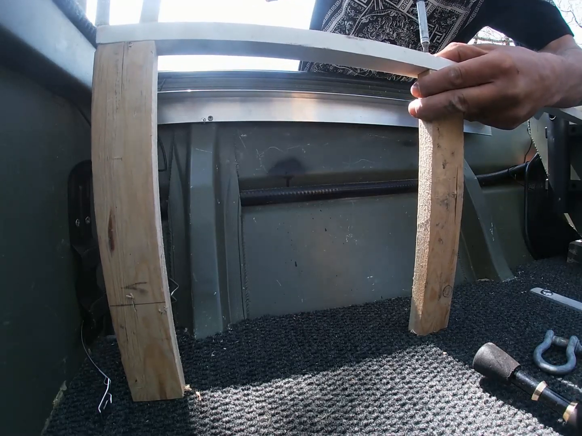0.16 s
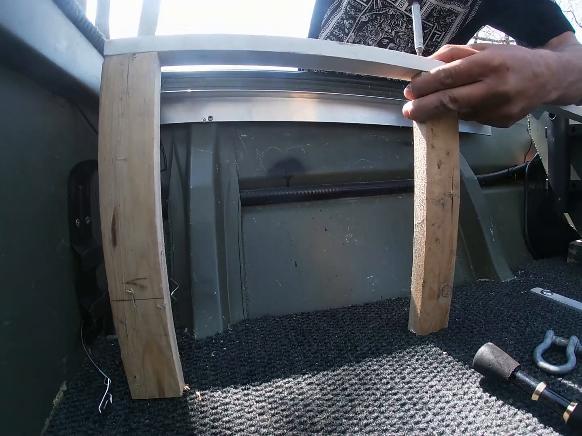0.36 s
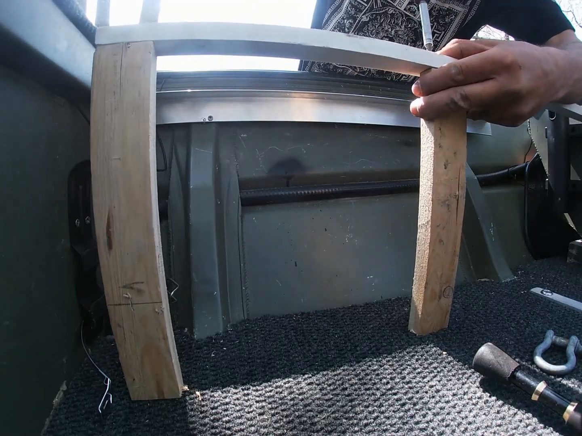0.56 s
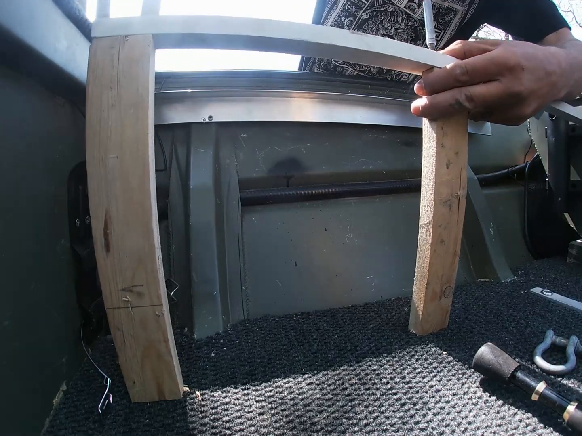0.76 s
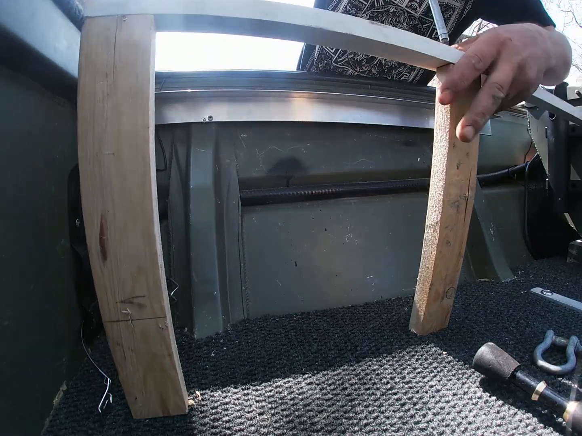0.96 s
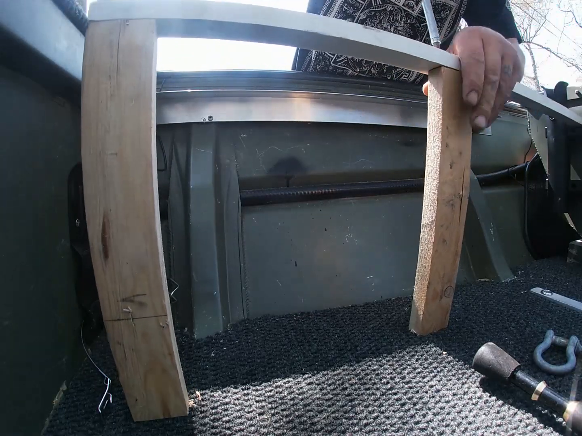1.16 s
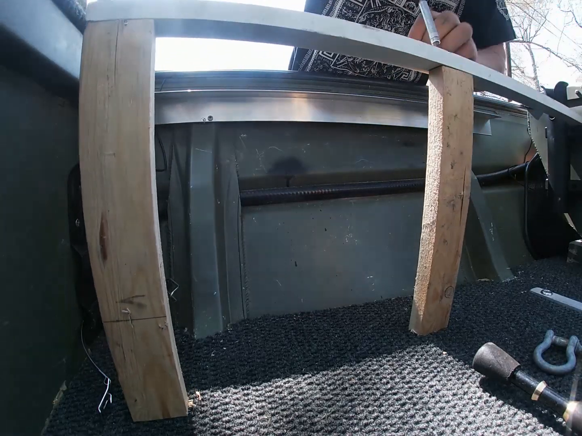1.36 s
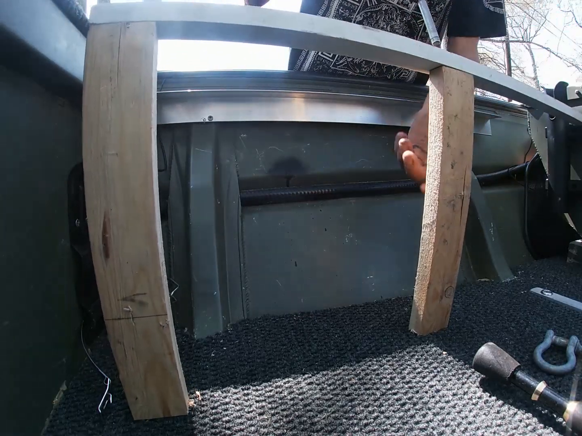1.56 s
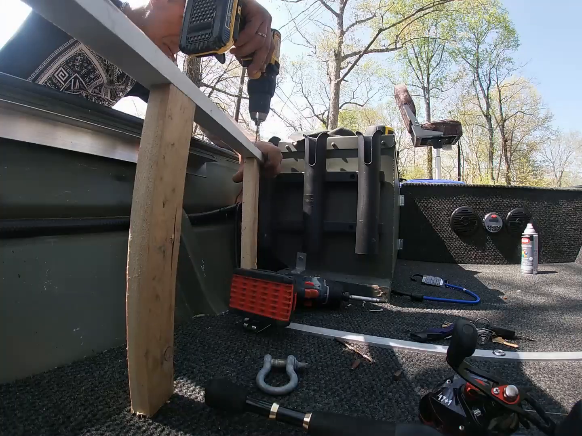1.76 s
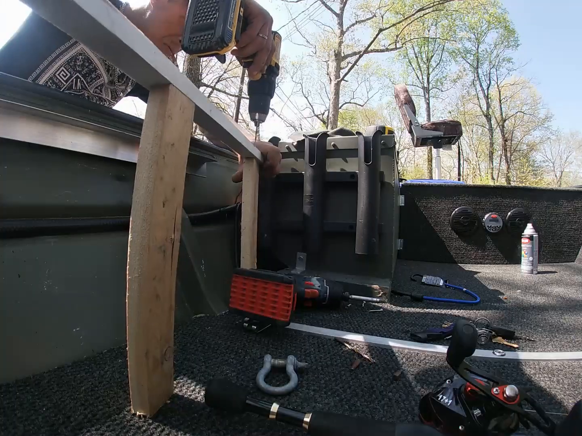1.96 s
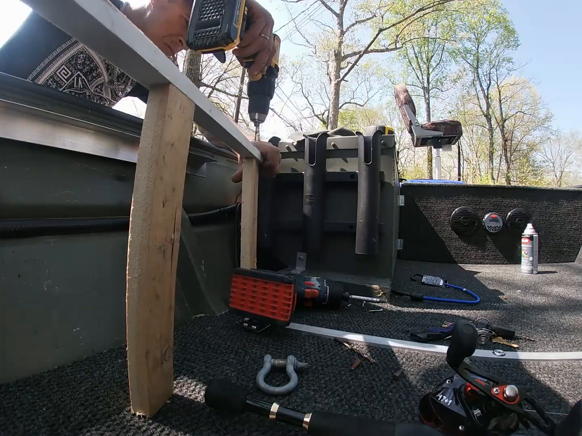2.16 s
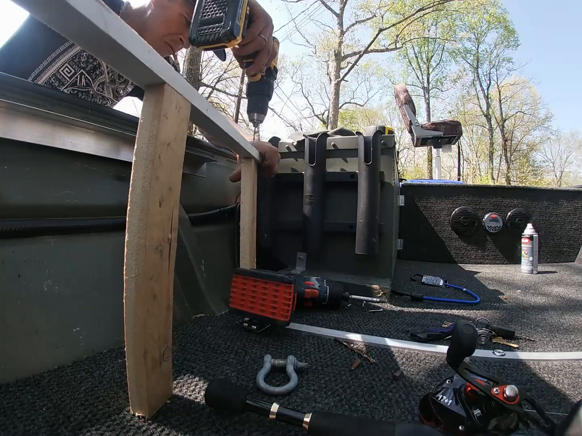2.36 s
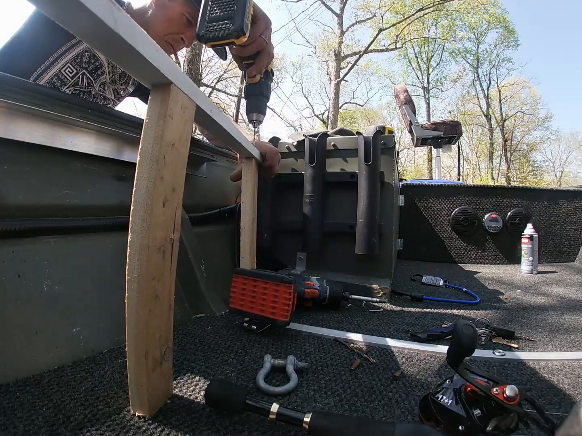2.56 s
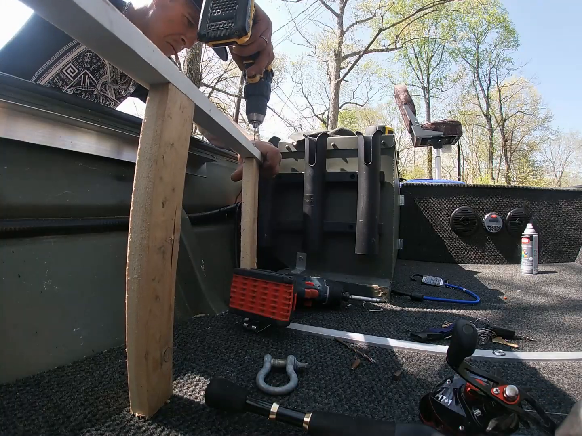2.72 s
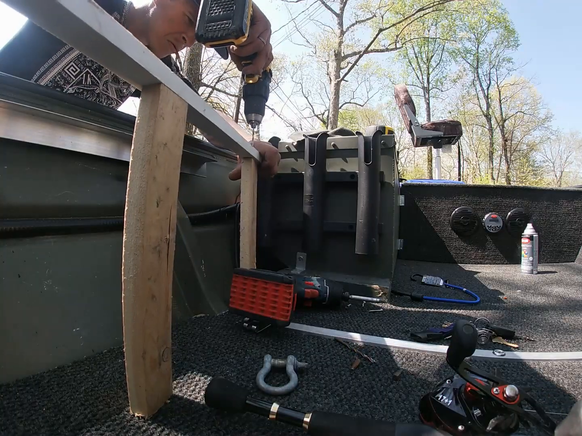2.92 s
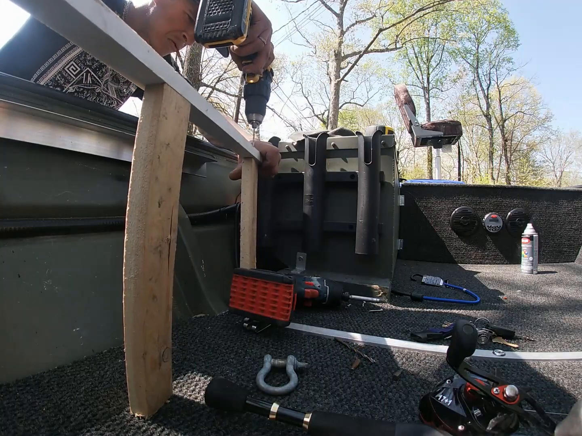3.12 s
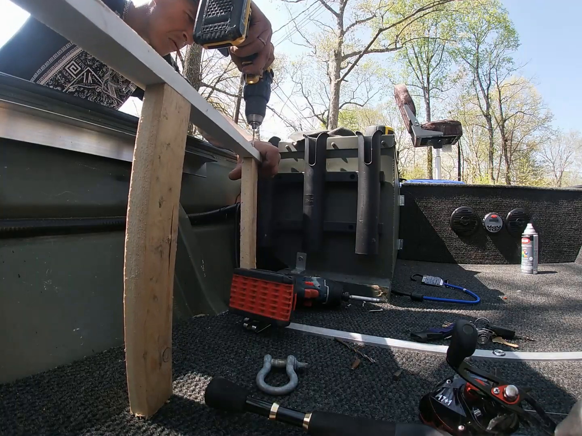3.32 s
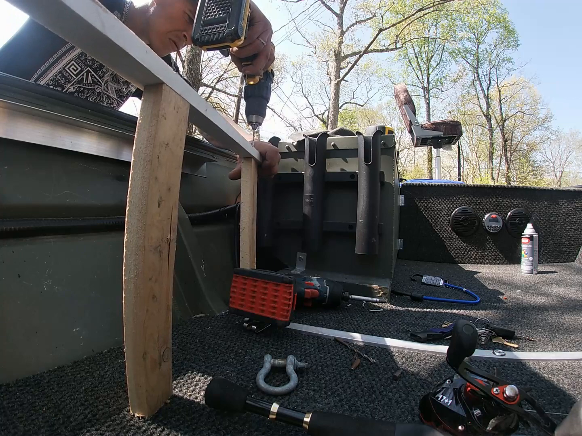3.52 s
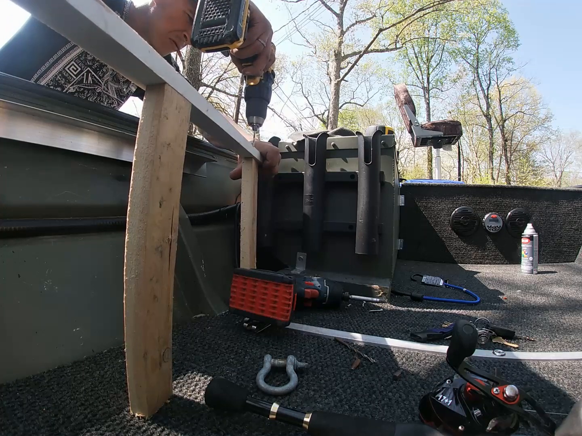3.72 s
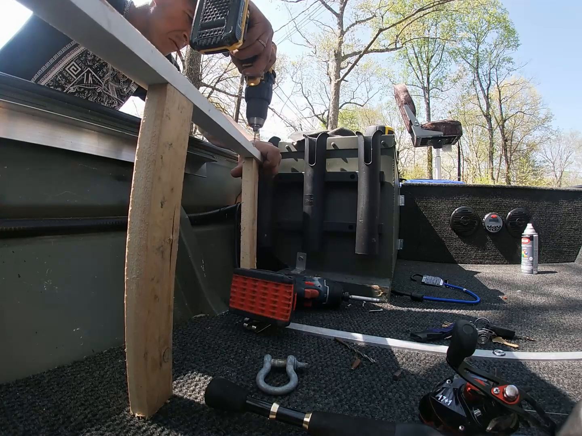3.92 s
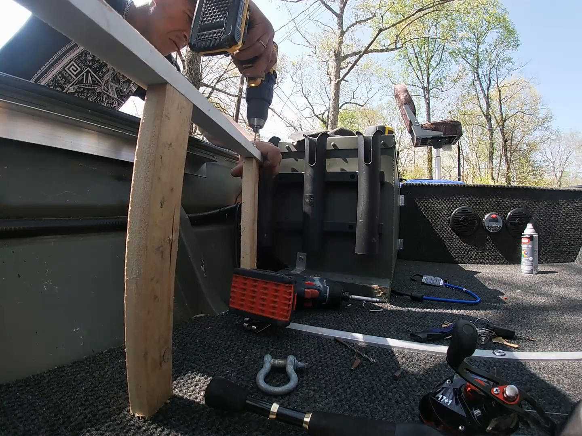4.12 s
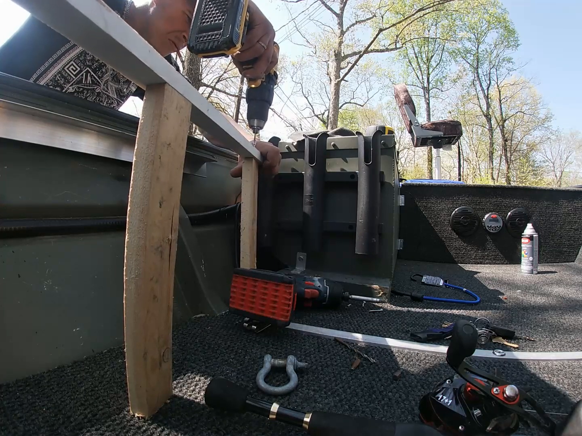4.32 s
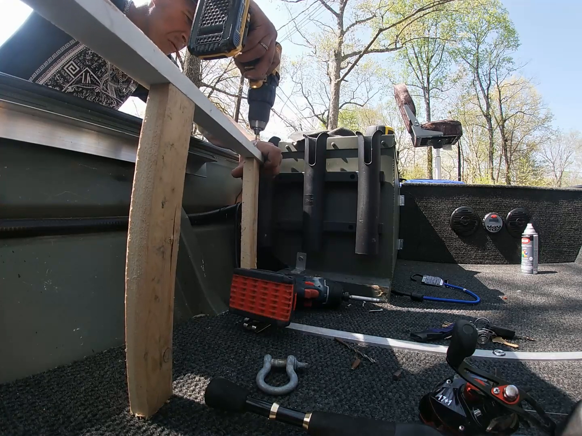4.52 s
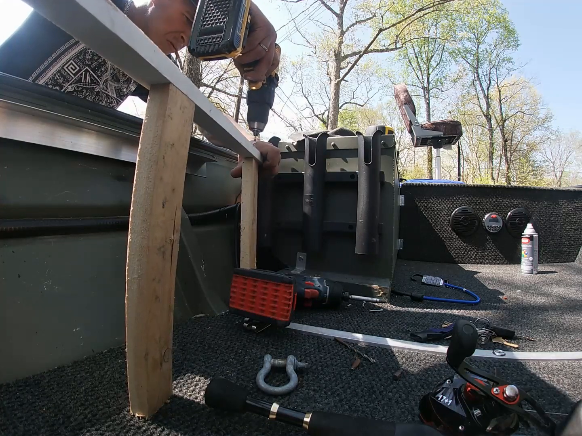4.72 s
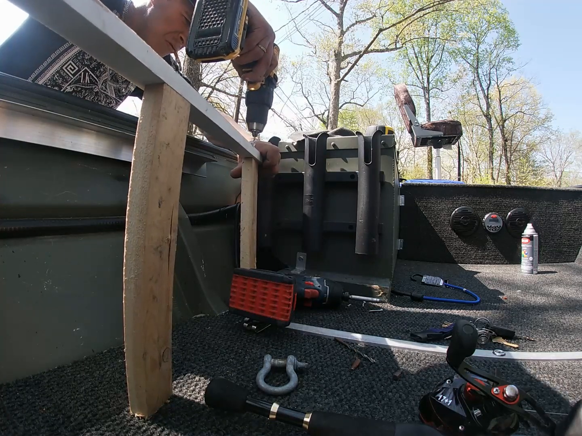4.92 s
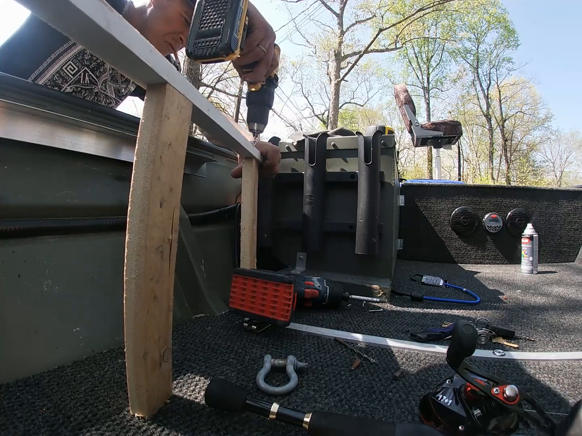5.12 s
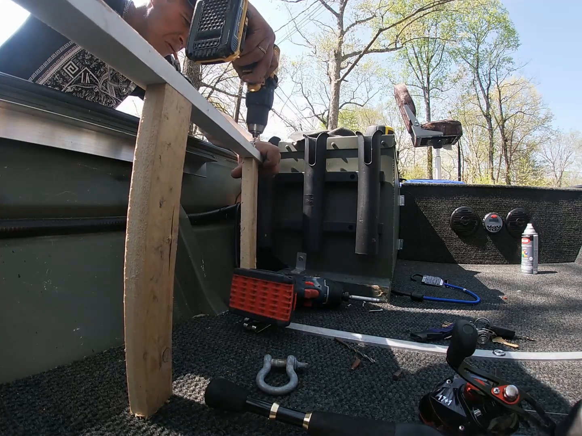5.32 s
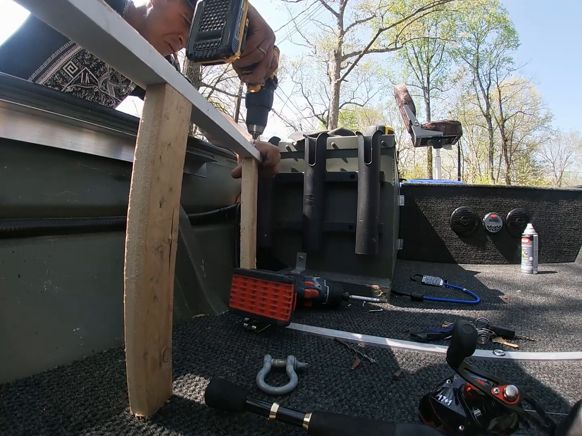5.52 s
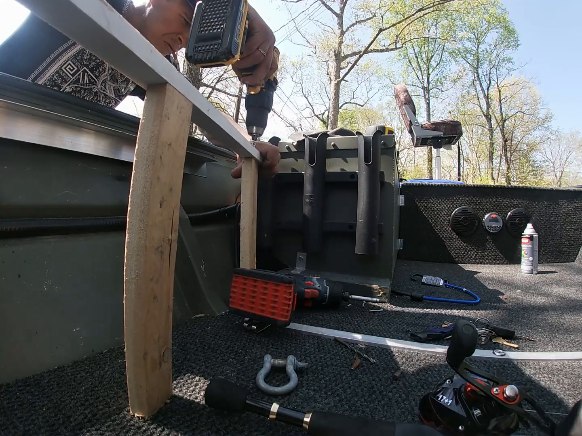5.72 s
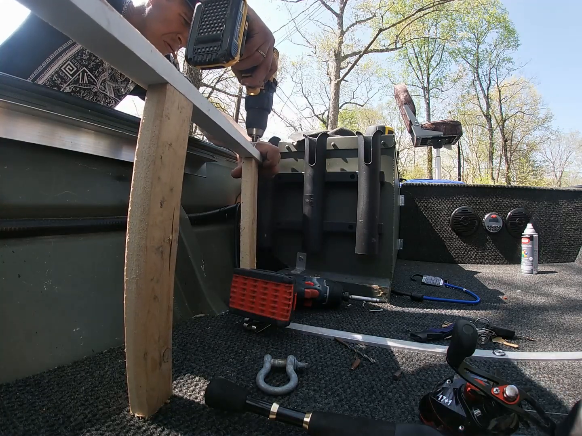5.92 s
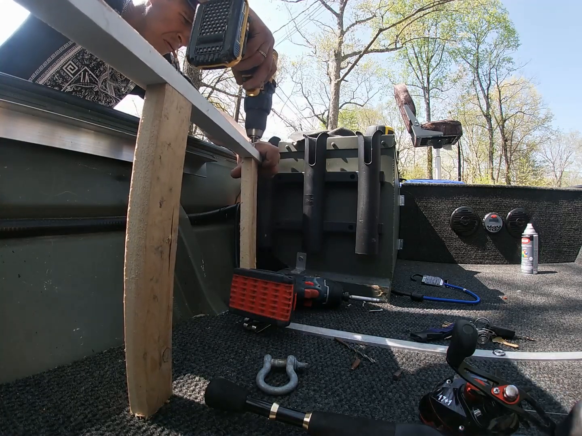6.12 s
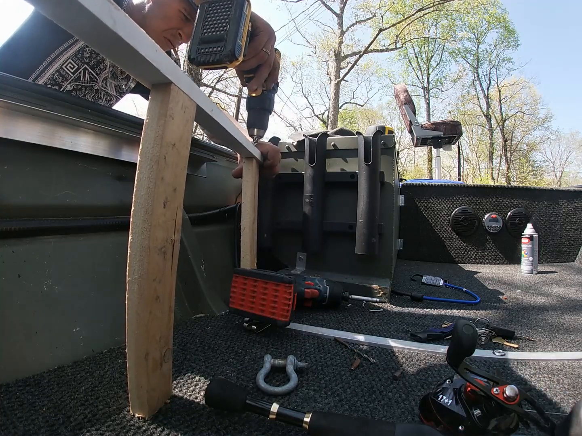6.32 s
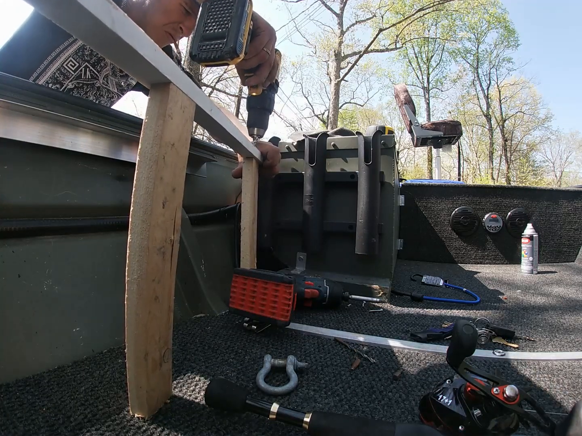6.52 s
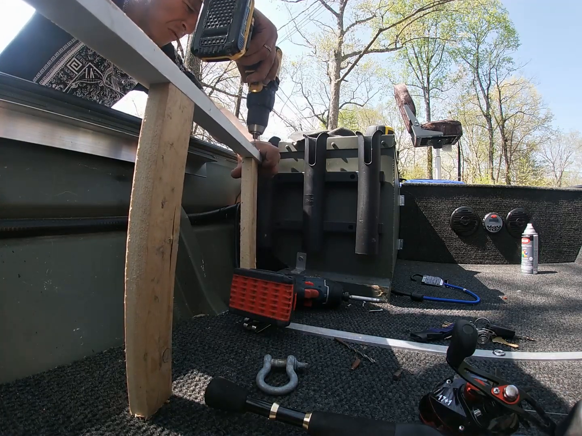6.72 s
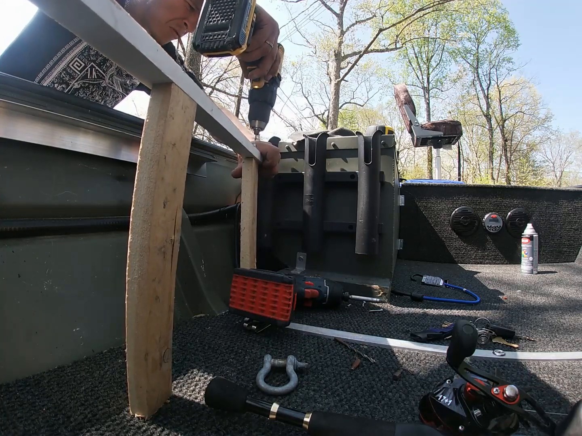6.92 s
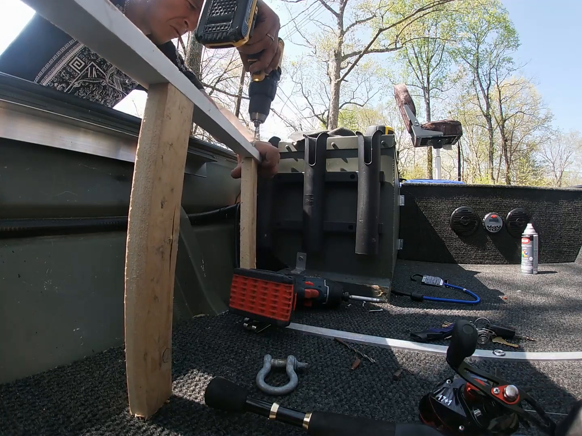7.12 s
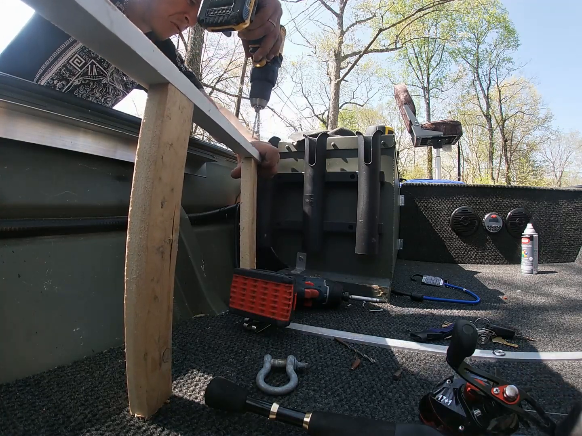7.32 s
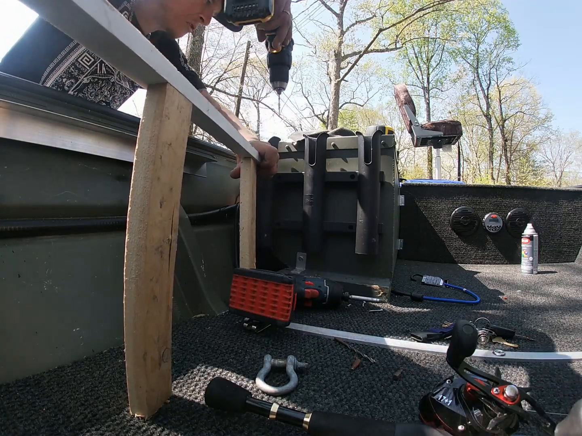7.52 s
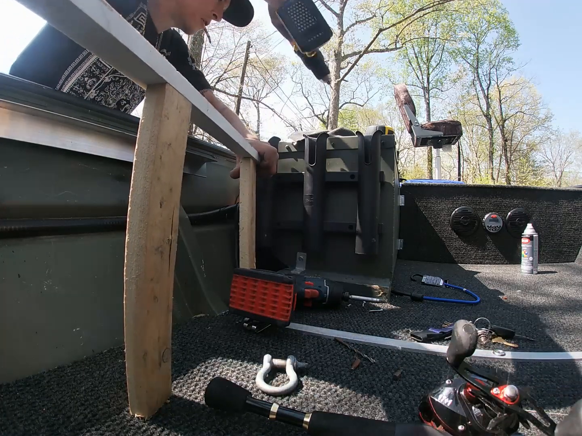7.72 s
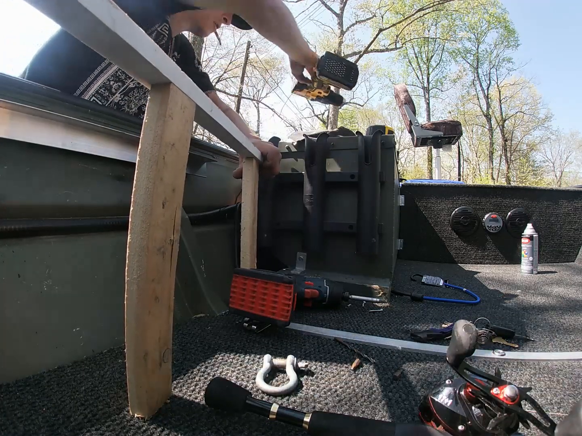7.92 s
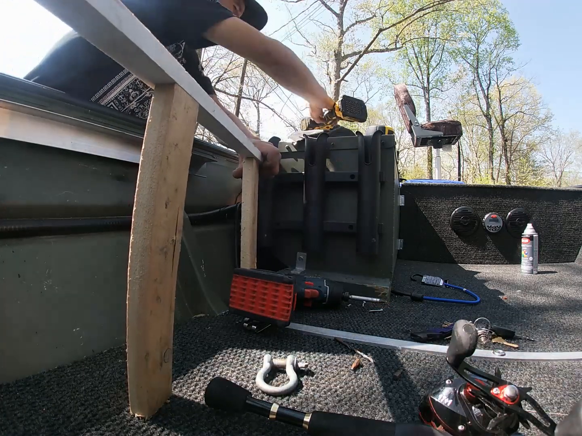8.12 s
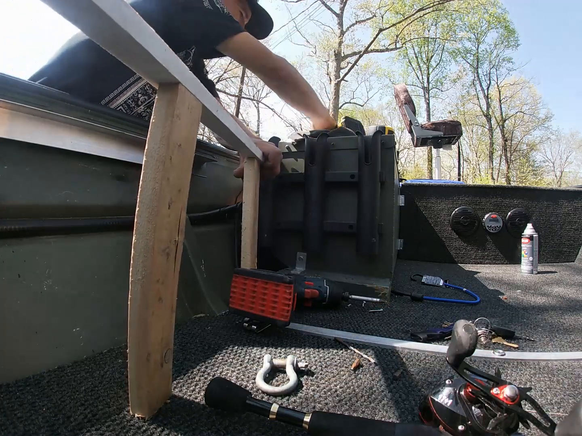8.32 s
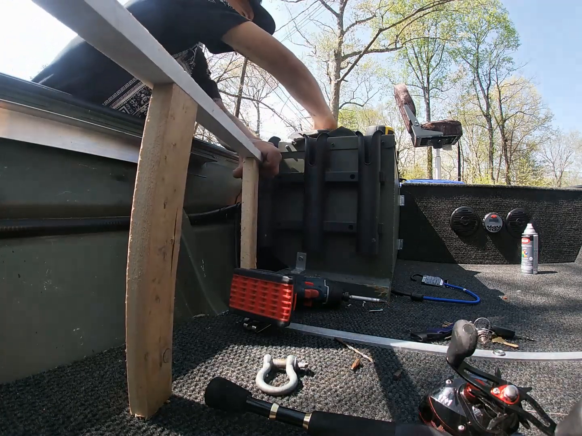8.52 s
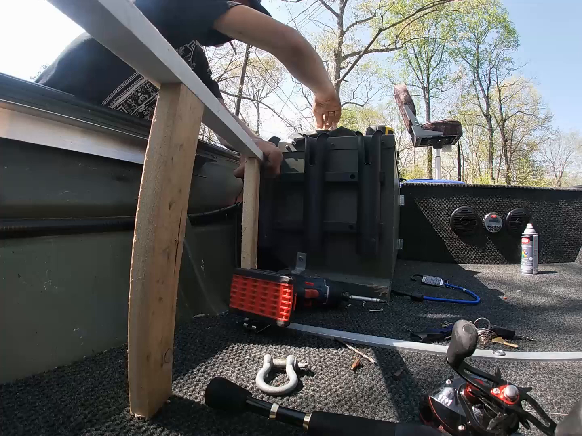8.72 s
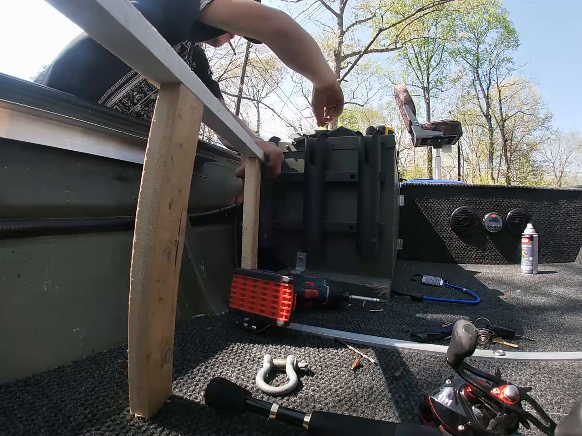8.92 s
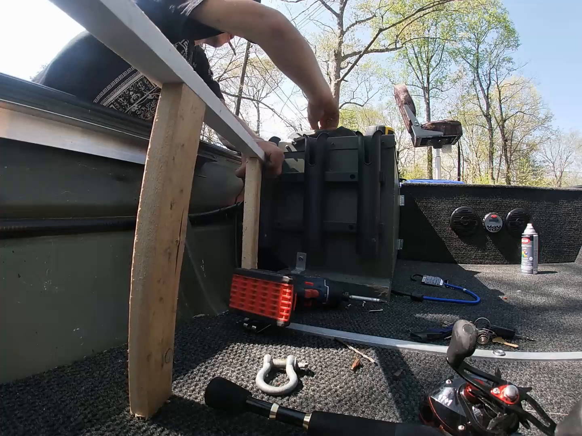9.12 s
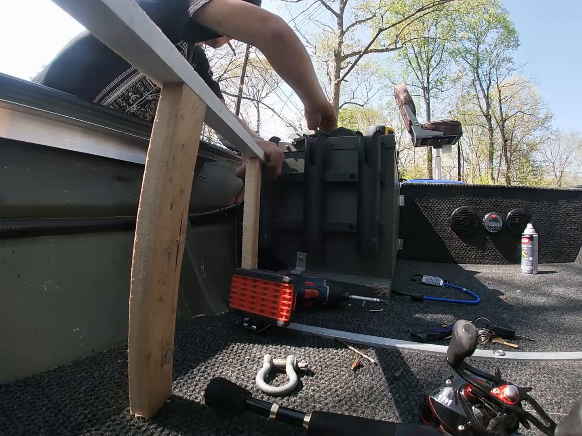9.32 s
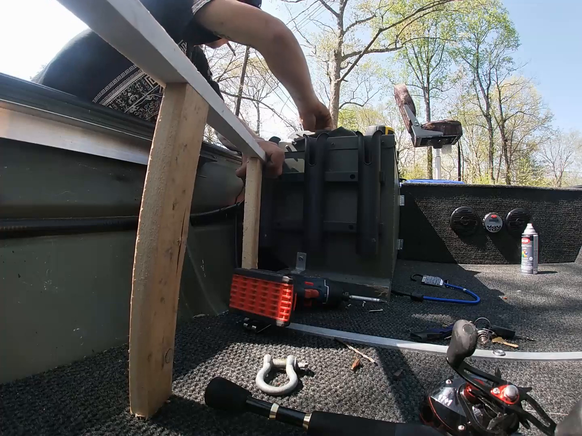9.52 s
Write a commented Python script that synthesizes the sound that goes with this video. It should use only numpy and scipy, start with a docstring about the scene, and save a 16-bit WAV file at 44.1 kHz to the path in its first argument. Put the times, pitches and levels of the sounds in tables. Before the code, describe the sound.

Outdoors in a metal boat: hard rail knocks, a quiet gap, a long labouring drill run, higher free spin, short reverse burst, soft thud.

```python
"""Metal scrapes along and raps on an aluminium rail in a metal boat outdoors, over a rumbling hull.
A cordless drill then bores under load, breaks through, runs free, stops, backs out and brakes, and
is laid down with a thud. Its drive is shaped noise with tones locked to a turning shaft; scrapes,
rustle and rumble are filtered noise under level curves; clicks, pings and thuds are decaying bursts
and modes. One microphone colours, limits and band-limits the sum, heard in mono."""
import sys
import numpy as np
from scipy import signal
from scipy.fft import rfft, irfft, next_fast_len
from scipy.io import wavfile
from scipy.ndimage import uniform_filter1d

SR = 44100
rng = np.random.default_rng(int(sys.argv[2]) if len(sys.argv) > 2 else 0)


def int16_out(signal):
    """Quantize to a 16-bit WAV file."""
    q = np.round(np.clip(np.atleast_2d(signal).T, -1, 1) * 32767)
    wavfile.write(sys.argv[1], SR, q.astype(np.int16))


N = 426006
T = np.arange(N) / SR  # time axis [s]

# Drill run of each stage, boring, free and backing out: (t/s, gear noise level/dB,
# turns per s of the shaft whose multiples stand out in that stage)
BORE = [(2.985, -36.5, 58), (3.01, -52, 80), (3.12, -44.5, 95), (3.16, -37.5, 114), (3.2, -32, 107.6),
        (3.27, -31.5, 116.1), (3.32, -32, 117.9), (3.6, -31, 119), (4.4, -30, 116.4), (4.85, -29.5, 117),
        (5.47, -29, 114), (5.521, -27, 124)]
FREE = [(5.49, -38.5, 134.6), (5.51, -27.5, 194.3), (5.526, -23.5, 241.6), (5.545, -21.5, 271),
        (5.57, -23, 291.5), (5.62, -22, 310.4), (5.7, -22, 312.5), (6.18, -23, 312.3), (6.214, -23.5, 302),
        (6.24, -24.5, 283.2), (6.27, -26, 253.4), (6.33, -28.5, 214), (6.36, -37.5, 194.6),
        (6.39, -37, 178), (6.41, -74, 162)]
BACK = [(6.52, -35, 124), (6.54, -41, 149.1), (6.57, -28.5, 195.5), (6.62, -24.5, 237.6),
        (6.654, -24, 263.8), (6.69, -23.5, 276), (6.77, -24.5, 284.2), (6.98, -24.5, 287.3),
        (7.031, -24.5, 281.3), (7.154, -28.5, 235.5), (7.196, -29.5, 214.6), (7.3, -33.5, 191.7),
        (7.33, -35.5, 171.3), (7.35, -29, 157), (7.385, -32.5, 142.6), (7.41, -37.5, 130), (7.44, -67, 120)]


def amp(db):
    """Decibel law: 20 dB is a factor of ten in amplitude."""
    return 10 ** (np.asarray(db) / 20)


def read(points, hz):
    """Spectrum level [dB] interpolated over log frequency, as pitch is heard; -80 dB outside."""
    f, value = np.transpose(points)
    return np.interp(np.log(hz + 1), np.log(f + 1), value, left=-80, right=-80)


def drift(rate_hz, count):
    """Random fluctuation: chance values at a slow rate joined by straight lines, rms about 0.84."""
    knots = rng.standard_normal(int(count / SR * rate_hz) + 2)
    return 1.03 * np.interp(T[:count] * rate_hz, np.arange(len(knots)), knots)


def casing(hz):
    """Resonance: each casing mode lifts the level [dB] in a bell around its own frequency."""
    # casing modes: (f/Hz, width/Hz, lift/dB)
    modes = [(715, 75, 4.5), (992, 87, 8.5), (1234, 140, 4), (1454, 130, 5), (1766, 150, 4.5),
             (2010, 97, 4.5), (2300, 56, 2), (2565, 150, 5.5), (3155, 81, 6.5), (3450, 84, 4),
             (3770, 80, 4), (3920, 120, 6), (4210, 87, 6), (4760, 220, 4.5), (5210, 280, 2.5),
             (5800, 300, 3.5), (5710, 74, 4), (6550, 100, 2), (6700, 92, 4.5), (7000, 90, 1),
             (7000, 110, 1.5), (7530, 98, 2.5), (7700, 56, 2.5), (8220, 83, 0), (8780, 130, 8.5),
             (9130, 130, 8), (9430, 90, 4), (9530, 110, 3), (9980, 160, 7.5), (10300, 200, 4)]
    return sum(db / (1 + (2 * (hz - f) / width) ** 2) for f, width, db in modes)


def noise(colour_db, patchy_db, flicker_db, size=512, count=N):
    """Short-time spectral synthesis: noise of rms 1 with a colour, drifting patches and a flicker."""
    frames, hz = count // (size // 4) + 5, np.fft.rfftfreq(size, 1 / SR)
    real, imag, patch = rng.standard_normal((frames, len(hz), 3)).T
    patch = uniform_filter1d(patch, size=6, axis=0)  # over frequency
    patch = uniform_filter1d(patch, size=12, axis=1)  # over time
    flicker = uniform_filter1d(rng.standard_normal(frames), size=3)  # shared by all pitches
    field = colour_db(hz)[:, None] + patchy_db * patch / patch.std()
    field = field + flicker_db * flicker / flicker.std()
    spectrum = (real + 1j * imag) * amp(field)
    out = signal.istft(spectrum, nperseg=size, noverlap=size * 3 // 4)[1][:count]
    return out / out.std()


def level(tables, column, fade=.006):
    """Envelope: gain along one dB column of some curves, silent outside them; fade in s."""
    out = np.zeros(N)
    for rows in map(np.array, tables):
        start, end = rows[0, 0], rows[-1, 0]
        span = slice(*np.searchsorted(T, [start - fade / 2, end + fade / 2]))
        edge = np.clip(np.minimum(T[span] - start, end - T[span]) / fade + .5, 0, 1)
        out[span] += amp(np.interp(T[span], rows[:, 0], rows[:, column])) * edge
    return out


def swells(rows, column):
    """Exponential growth and decay: gain straight in dB up to each peak and down again."""
    swell_db = 20.5  # gained over the rise time, lost over the fall time
    out = np.zeros(N)
    for row in rows:
        peak_s, (rise, fall) = row[0], row[-2:]
        away = np.maximum((peak_s - T) / rise, (T - peak_s) / fall)
        out += amp(row[column] - swell_db * np.minimum(away, 4)) * (away < 4)
    return out


def still():
    """Stationary broadband noise: distant wind, traffic and microphone hiss."""
    # spectrum of the outdoor floor: (f/Hz, level/dB per Hz)
    floor_tone = [(12, -36), (20, -6.5), (54, -2), (161, 1), (380, -19.5), (483, -21.5), (538, -31),
                  (762, -19), (919, -30), (1270, -29.5), (1530, -35.5), (5520, -35), (8250, -53),
                  (9950, -46.5), (12000, -57.5), (15600, -92.5), (22000, -120)]
    floor_db = -52
    floor = noise(lambda hz: read(floor_tone, hz), patchy_db=0.0, flicker_db=1.7, size=2048)
    return amp(floor_db) * floor


def rumble():
    """Forced vibration: feet, hands, drill and wind shake the hull in three ranges with own gusts."""
    # rumble from feet, hands and wind: (t/s, deep level/dB, middle level/dB, upper level/dB)
    hull_level = [(0, -30.5, -35.5, -26), (.2, -28, -38.5, -27), (.35, -26.5, -37, -35),
                  (.435, -36, -43, -23.5), (.49, -41, -35.5, -35.5), (.55, -24, -29, -28.5),
                  (.68, -37, -41, -35), (.78, -28, -38, -36), (.9, -47, -38, -54), (1.1, -37, -41.5, -48.5),
                  (1.47, -51.5, -36.5, -47.5), (1.66, -49, -42.5, -46), (1.7, -52, -52, -61.5),
                  (2.2, -53, -56, -72.5), (2.6, -55, -52.5, -72), (2.72, -68.5, -59, -74.5),
                  (2.97, -51.5, -56, -63), (3.2, -42, -45.5, -60), (3.48, -54, -47, -72),
                  (7.45, -69, -66, -76.5), (7.64, -61, -51, -63), (7.75, -61.5, -65, -67.5),
                  (8.3, -52.5, -52.5, -63), (8.47, -47.5, -51, -69.5), (8.5, -40, -27.5, -43),
                  (8.6, -36, -41, -56.5), (8.72, -41, -50, -62.5), (8.96, -63, -66, -79),
                  (9.23, -55.5, -58.5, -64.5), (9.3, -51, -47.5, -51), (9.47, -58, -47.5, -55),
                  (9.564, -49.5, -38, -51), (9.66, -66, -57, -61)]
    # spectra of the deep, middle and upper range: (f/Hz, level/dB per Hz)
    deep_tone = [(8.8, -36), (15, -12), (49, -7), (70, -2), (115, -7.5), (150, -38), (250, -120)]
    middle_tone = [(59, -37.5), (100, -5.5), (118, -8.5), (156, 5.5), (188, -5), (221, -1.5), (245, -6.5),
                   (320, -33), (540, -120)]
    upper_tone = [(130, -42), (228, -6.5), (295, 3.5), (345, -13.5), (372, -19.5), (407, -12), (432, -17),
                  (477, -12), (520, -23.5), (680, -58.5), (1140, -120)]
    # shaking by the drill, one row a stage: (deep, middle, upper level/dB relative to the gear noise)
    drill_shake = [(-25, -17.5, -23.5), (-24.5, -17.5, -30), (-19.5, -21.5, -19.5)]
    gust_db, gust_hz = 2.5, 9  # scale and rate of the gusts
    out = np.zeros(N)
    for k, tone in enumerate((deep_tone, middle_tone, upper_tone)):
        shake = sum(level([rows], 1) * amp(db[k]) for rows, db in zip((BORE, FREE, BACK), drill_shake))
        gusts = amp(gust_db * drift(gust_hz, count=N))
        gain = np.hypot(level([hull_level], k + 1), shake) * gusts  # powers add
        out += noise(lambda hz: read(tone, hz), patchy_db=.5, flicker_db=0.7, size=2048) * gain
    return out


def rustle():
    """Friction noise of hands and cloth, scuffs and taps, split into a dull and a bright layer."""
    # quiet rubbing before, between and after the drill runs: (t/s, dull level/dB, bright level/dB)
    rubbing = [
        [(.85, -54, -67), (.9, -67, -71), (1.25, -54.5, -67.5), (1.55, -57.5, -85), (1.665, -55, -72)],
        [(1.67, -63.5, -67.5), (1.85, -74, -75.5), (2.39, -74.5, -75.5), (2.41, -72.5, -64.5),
         (2.7, -75, -70.5), (2.95, -63, -67), (2.98, -63, -65)],
        [(6.415, -70, -69), (6.517, -68, -67)],
        [(7.445, -68, -68), (7.55, -66, -84), (7.85, -67, -79), (8.2, -71, -86.5), (8.45, -77.5, -78.5),
         (8.55, -68, -77), (8.8, -63, -71.5), (9.1, -62.5, -77.5), (9.25, -67.5, -82), (9.66, -73, -77)],
    ]
    # single scuffs and dull taps: (peak t/s, dull level/dB, bright level/dB, rise/s, fall/s)
    scuffs = [(.992, -64, -60.5, .1, 0.081), (2.494, -66.5, -67.5, .06, 0.019),
              (2.715, -66, -65, .02, 0.056), (2.855, -67, -70, .01, 0.085), (6.459, -61, -60.5, .05, 0.063),
              (7.631, -60, -69, 0.085, 0.12), (7.823, -67.5, -65.5, .1, 0.055),
              (8.201, -79.5, -71, .04, 0.047), (8.47, -78.5, -56.5, 0.08, 0.028),
              (8.488, -47, -59, .004, 0.054), (8.598, -49, -70, .004, .015), (8.64, -65, -68, 0.031, 0.034),
              (9.285, -61, -70.5, 0.0092, 0.1), (9.41, -49, -66, 0.0033, 0.097),
              (9.532, -52, -63, .03, 0.052), (9.566, -54.5, -62, .04, 0.065)]
    # spectrum before the split: (f/Hz, level/dB per Hz)
    rub_tone = [(210, -37), (350, -6), (379, -0.5), (473, -6), (692, -6.5), (738, -8.5), (1060, -8),
                (1740, -8.5), (2200, -15), (3720, -16), (9790, -28.5), (15500, -67)]
    split_hz = 2500

    def dull_colour(hz):
        return read(rub_tone, hz) - 10 * np.log10(1 + (hz / split_hz) ** 8)

    def bright_colour(hz):
        return read(rub_tone, hz) - 10 * np.log10(1 + (split_hz / (hz + 1)) ** 8)

    dull = noise(dull_colour, patchy_db=2.3, flicker_db=1)
    bright = noise(bright_colour, patchy_db=.9, flicker_db=2.5)
    return sum((level(rubbing, k) + swells(scuffs, k)) * layer for k, layer in enumerate((dull, bright), 1))


def thuds():
    """Modal ringing: each blow rings mostly the hull modes near its pitch."""
    # blows into the hull: (t/s, peak level/dB, pitch f/Hz)
    blows = [(.261, -7.5, 240), (.539, -9, 198), (.598, -28, 65), (.695, -4.5, 253), (.715, -6.5, 280),
             (.738, -22, 99), (.774, -22, 97), (1.099, -28.5, 63.7), (1.989, -35.5, 61),
             (3.148, -28.5, 45.8), (8.596, -24, 101), (6.548, -30, 176), (8.482, -9, 72),
             (8.484, -22.5, 200), (8.486, -46, 400), (9.279, -34, 214), (9.31, -32.5, 221),
             (9.445, -34, 200), (9.53, -32, 180), (9.546, -28, 169), (9.562, -25, 192)]
    # hull modes: (f/Hz, level/dB, t60/s)
    modes = [(45.6, 0.5, .35), (54, 2, .45), (73.5, -0.5, 0.37), (99.4, -1.5, 0.35), (121.5, -2, 0.19),
             (167.3, 0, 0.2), (202.5, -3.5, 0.1), (232, 3, 0.099), (267, 0.5, .1), (333, -7, 0.084),
             (476, -9, 0.082)]
    out, t = np.zeros(N + SR // 2), np.arange(SR // 2) / SR
    for (s, db, hz), phases in zip(blows, rng.random((len(blows), len(modes)))):
        ring = np.zeros(len(t))
        for (f, mode_db, t60), phase in zip(modes, phases):
            off_pitch_db = 10 * abs(np.log2(f / hz))  # 10 dB lost per octave away
            decay = amp(mode_db - off_pitch_db - 60 * t / t60)
            ring += decay * np.sin(2 * np.pi * (f * t + .5 + .25 * phase))
        ring *= (1 - np.exp(-t * hz / 0.5)) ** 2  # the sheet takes a moment to swing up
        out[round(s * SR):][:len(t)] += amp(db) * ring / abs(ring).max()
    return out[:N]


def pings():
    """Free damped oscillation: small knocked metal parts each ring as one dying sine."""
    # rings: (t/s, f/Hz, level/dB, t60/s)
    rings = [(2.983, 1370, -35, 0.034), (3.199, 1350, -22, 0.034), (6.381, 1200, -19.5, 0.016),
             (9.505, 7600, -64, 0.06), (9.588, 7550, -62.5, .3)]
    out, t = np.zeros(N + SR // 2), T[:SR // 2]
    for s, hz, db, t60 in rings:
        decay = amp(db - 60 * t / t60) * np.minimum(t / 0.0011, 1)
        out[round(s * SR):][:len(t)] += decay * np.sin(2 * np.pi * hz * t)
    return out[:N]


def clicks():
    """Impact excitation: raps, trigger and brake clicks as noise bursts coloured by the casing."""
    # impacts: (t/s, approximate peak level/dB, t60/s, treble tilt/dB per octave)
    impacts = [(0.033, -24.5, 0.033, -4), (0.258, -1, 0.037, 1), (0.262, -14, 0.083, -8),
               (0.431, -30, 0.026, -4), (0.538, -3, 0.038, -0.5), (0.546, -2, 0.02, -3.5),
               (0.609, -29, 0.02, -7), (0.698, -8.5, 0.078, -2), (0.714, -4.5, 0.048, 1.5),
               (0.722, -4.5, 0.031, -1), (0.731, -5, 0.034, 5), (0.739, -4, 0.025, -0.5),
               (0.823, -30, 0.037, -4.5), (0.839, -35.5, 0.03, -2), (2.397, -30, 0.027, 0),
               (2.722, -37.5, 0.03, 3), (2.982, -27.5, 0.045, -0.5), (3.197, -18, .02, 2),
               (6.369, -36, 0.03, -15), (6.372, -12, 0.025, -2), (6.383, -14, 0.036, -3.5),
               (6.52, -18.5, 0.046, -0.5), (6.542, -23, 0.057, -2.5), (7.338, -27, 0.03, 0),
               (7.431, -47.5, 0.028, 2), (8.486, -42.5, 0.024, 6), (8.594, -57, 0.032, -6),
               (9.408, -50, 0.03, 12), (9.548, -43, .02, 11)]
    # spectrum of an impact: (f/Hz, level/dB per Hz)
    impact_tone = [(260, -30), (450, -8.5), (562, -25), (814, -17), (1490, -10.5), (2290, -7), (3270, -3.5),
                   (5030, -13), (5920, -6.5), (7070, -14), (9510, -24), (13600, -39.5), (15500, -50)]
    size = 4096
    out, t, hz = np.zeros(N + size), np.arange(size) / SR, np.fft.rfftfreq(size, 1 / SR)
    for (s, db, t60, tilt_db), burst in zip(impacts, rng.standard_normal((len(impacts), size))):
        tilt = tilt_db * np.log2(hz / 3000 + .01)
        burst = irfft(rfft(burst) * amp(read(impact_tone, hz) + casing(hz) + tilt))
        decay = amp(-60 * t / max(t60, .004))
        tail = amp(-19.0 - 60 * t / .09)  # weaker, with a t60 of 90 ms
        shape = np.minimum(t / .0006, 1) * (decay + tail)
        # noise peaks stand some 8 dB over its rms
        out[round(s * SR):][:size] += amp(db - 8) * burst / burst.std() * shape
    return out[:N]


def scrape():
    """Stick-slip friction: metal dragged on the rail gives gritty, patchy noise."""
    # strokes: (start t/s, end t/s, level/dB at start, level/dB at end)
    drags = [(0, .257, -32, -31), (0.294, .536, -38.5, -34), (0.568, .607, -37, -46),
             (0.605, .697, -37.5, -36), (.75, .823, -42, -52), (0.826, .86, -40.5, -64)]
    # spectrum of the grit: (f/Hz, level/dB per Hz)
    grit_tone = [(210, -30.5), (350, -13), (430, -10), (473, 2), (529, -14.5), (761, -15), (1330, -14.5),
                 (1710, -17.5), (1910, -15), (3960, -11.5), (4570, -21), (9480, -39.5), (15500, -78.5)]
    strokes = [[(start, from_db), (end, to_db)] for start, end, from_db, to_db in drags]
    grit = noise(lambda hz: read(grit_tone, hz), patchy_db=2.5, flicker_db=1.5, size=256)
    return grit * level(strokes, 1)


def squeal():
    """Narrow-band noise: it flutters as the trigger is part pressed, only while the motor turns."""
    # squeals: (peak t/s, level/dB, rise/s, fall/s)
    squeal_rows = [(2.985, -49, 0.0056, .1), (3.212, -29, .1, .03), (5.528, -25.5, .04, .05),
                   (6.31, -33, .04, 0.059), (6.582, -28, 0.064, .04), (7.375, -33, .1, .045)]
    centre_hz, width_hz = 3920, 350  # width between the points 6 dB down

    def colour(hz):
        return -20 * np.log10(1 + (2 * (hz - centre_hz) / width_hz) ** 2)

    band = noise(colour, patchy_db=0, flicker_db=1.2)
    runs = [[(first[0][0], 0), (last[-1][0], 0)] for first, last in ((BORE, FREE), (BACK, BACK))]
    return band * swells(squeal_rows, 1) * level(runs, 1)


def stage(rows, leads, whine, mesh, tone, throb, waver_db, lead_waver_db, settle_s):
    """Order-locked excitation: noise throbbing once a turn plus shaft tones, filtered by the casing."""
    slack_db = 35  # mesh tones lose this times the share by which the shaft is under its top speed
    grid = np.arange(SR // 2 + 1.)
    colour = read(tone, grid) + casing(grid)
    colour -= 10 * np.log10(np.sum(amp(2 * colour[500:12000])))  # unit power, so dB in one Hz
    gain = level([rows], 1)
    on = gain > 0
    hz = np.interp(T[on], *np.transpose(rows)[[0, 2]])
    count = len(hz)
    turn = 2 * np.pi * np.cumsum(hz) / SR  # shaft angle [rad]
    out = noise(lambda f: np.interp(f, grid, colour), patchy_db=0.84, flicker_db=0.66, size=1024, count=count)
    out *= 1 + throb * np.cos(turn)
    slack = slack_db * (1 - hz / hz.max())
    for k, db in mesh:  # each mesh tone wavers slowly and at random in level
        waver = waver_db * drift(rate_hz=14, count=count)
        size = amp(db - slack + np.interp(k * hz, grid, colour) + waver)
        out += np.sqrt(2) * size * np.cos(k * turn + 2 * np.pi * rng.random())
    settled = np.minimum(T[:count] / settle_s, 1) ** 4  # the lead tones clear up after a jerky start
    for k, db in leads:
        waver = lead_waver_db * drift(rate_hz=20, count=count)
        size = amp(db + np.interp(k * hz, *np.transpose(whine)) + waver)
        out += np.sqrt(2) * size * settled * np.cos(k * turn)
    full = np.zeros(N)
    full[on] = out * gain[on]
    return full


def drill():
    """Source and filter in three stages: boring under load, running free, backing out."""
    # lead tones: (multiples of the stage's shaft), and (the level/dB of each over its whine curve)
    bore_leads, bore_lead_db = (15.5, 30), (-1.5, -1)
    free_leads, free_lead_db = (4, 8.015, 8.153, 12, 16, 18), (-0.5, 1, 1, -4, 1, -5)
    back_leads, back_lead_db = (4, 12, 16, 21.3), (-1, 0, 1, -9)
    # whine of the lead tones by the pitch they pass through: (f/Hz, level/dB over the gear noise)
    bore_whine = [(900, -45), (1700, -40), (1790, -15), (1830, -14), (2000, -35), (3350, -34), (3470, -20),
                  (3510, -9), (3560, -8)]
    free_whine = [(600, -35), (950, -21), (1030, -13), (1100, -11), (1180, -6.5), (1215, -9.5), (1255, -7),
                  (1600, -35), (2300, -14), (2440, -20.5), (2500, -15.5), (2550, -9.5), (2800, -24),
                  (3700, -23), (3900, -7), (4200, -9), (4400, -13), (4850, -11), (5010, -22.5), (5400, -34)]
    back_whine = [(540, -39), (620, -8), (715, -6.5), (790, -9.5), (850, -25), (900, -21.5), (986, -10.5),
                  (1045, -26), (1100, -19), (1150, -13), (1900, -42), (2350, -20), (2480, -13), (2650, -23),
                  (2950, -20.5), (3150, -9.5), (3320, -9), (3500, -23), (3750, -8), (3960, 7.5),
                  (4200, -4.5), (4400, -7), (4480, -22), (4580, -13.5), (5000, -30.5)]
    # gear-mesh tones at top speed: (multiple of the stage's shaft, level/dB over the noise in one Hz)
    bore_mesh = [(1.295, 13), (3.16, 20), (3.55, 20), (4.585, 23), (6.17, 16), (9.17, 21.5), (9.33, 24.5),
                 (10.31, 21.5), (12.19, 14), (13.31, 12.5), (14.38, -12), (15.34, 16), (15.64, 26),
                 (18.33, 19), (19.69, 18.5), (21.52, 16), (24.68, 18), (32.09, 18.5), (36.67, 19),
                 (45.62, 16.5), (49.48, 17)]
    free_mesh = [(.127, 18), (.51, 14), (.6, 17), (.905, 22), (2.755, 8.8), (3.39, 21), (5.38, 12),
                 (7.88, 16), (8.27, 15), (10.2, 14), (10.64, 15), (12.49, 16), (12.64, 19), (13.36, 21),
                 (13.52, 19), (13.66, 23), (14.1, 15), (18.65, 18), (18.91, 14.84), (21, 16), (24.29, 13)]
    back_mesh = [(.235, 22), (.595, 23.8), (1, 36.9), (1.14, 8.3), (2.75, 21.6), (3.45, 16), (4.99, 16),
                 (10.98, 21), (13.66, 24), (15.41, 14), (16.58, 14), (19.6, 14), (24.28, 21)]
    # colour of casing and rail, before the casing modes: (f/Hz, level/dB per Hz)
    bore_tone = [(150, -39), (250, -34), (413, -3.5), (603, -13.5), (717, -7.5), (867, -14.5), (1610, -5),
                 (1790, -7), (1950, -6.5), (3510, -0.5), (4470, -5), (5690, 2), (7900, -12.5),
                 (9230, -10.5), (15500, -45.5)]
    free_tone = [(150, -64), (250, -18.5), (809, -18), (1220, -11), (1330, -13), (1700, -9), (2130, -19),
                 (2490, -9.5), (2900, -13.5), (3280, -8), (4550, -11.5), (5690, -6), (7900, -20),
                 (9390, -18.5), (15500, -55)]
    back_tone = [(150, -19), (250, -12.5), (282, -11), (366, -17.5), (768, -10.5), (867, -14), (1120, -3.5),
                 (1590, -5.5), (2850, -5), (3960, -2.5), (4390, -4), (5790, -0.5), (7250, -12),
                 (9070, -13.5), (15500, -46)]
    boring = stage(BORE, zip(bore_leads, bore_lead_db), bore_whine, bore_mesh, bore_tone,
                   throb=0.079, waver_db=3.5, lead_waver_db=2.5, settle_s=.3)
    free = stage(FREE, zip(free_leads, free_lead_db), free_whine, free_mesh, free_tone,
                 throb=.1, waver_db=2, lead_waver_db=1.2, settle_s=.02)
    backing = stage(BACK, zip(back_leads, back_lead_db), back_whine, back_mesh, back_tone,
                    throb=0.083, waver_db=2, lead_waver_db=1.3, settle_s=.105)
    return boring + free + backing


def scene():
    """Superposition: the pressures of all sources add at one microphone."""
    background = still() + rumble() + rustle()
    knocks = thuds() + pings() + clicks()
    mono = background + knocks + scrape() + squeal() + drill()
    return np.array([mono, mono])


def record(dry):
    """Transducer response: microphone colour, soft overload on the loudest raps, then a band limit."""
    # microphone response: (f/Hz, level/dB)
    mic = [(10, -1), (9000, 0), (10500, -1.5), (11200, -3), (12500, -1), (14000, 6.5), (15000, 4.5),
           (22050, 4)]
    edge_hz, overload = 15850, .9  # band limit; amplitude where the overload bends
    size = next_fast_len(N)
    hz = np.fft.rfftfreq(size, 1 / SR) + 10  # the offset keeps 0 Hz inside the table
    heard = irfft(rfft(dry, size) * amp(read(mic, hz)), size)[:, :N]
    heard = heard / (1 + (abs(heard) / overload) ** 4) ** .25
    lowpass = signal.firwin(511, edge_hz, window=("kaiser", 9), fs=SR)
    return signal.oaconvolve(heard, lowpass[None], "same")


dry = scene()
out = record(dry)
int16_out(out)
```